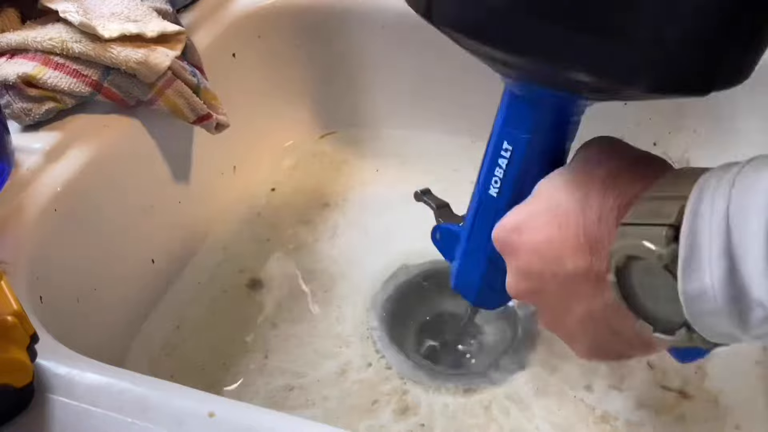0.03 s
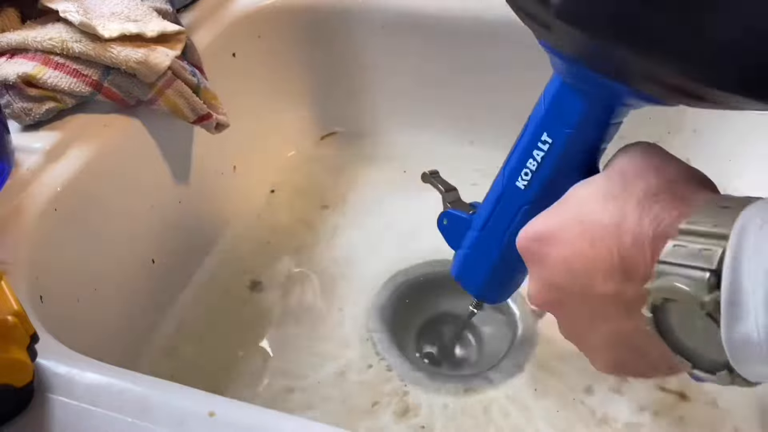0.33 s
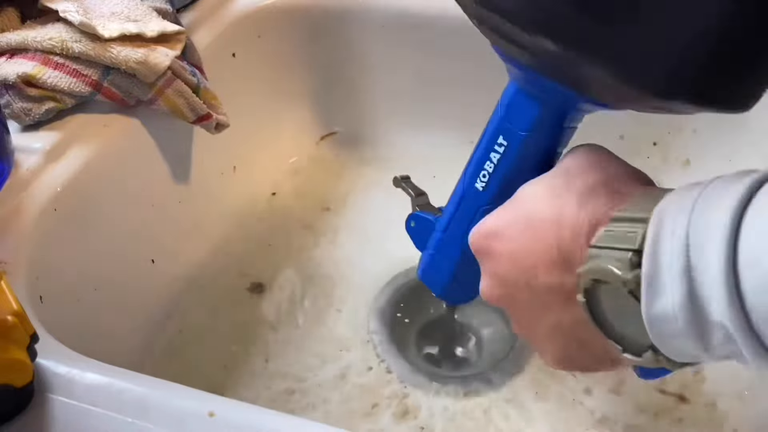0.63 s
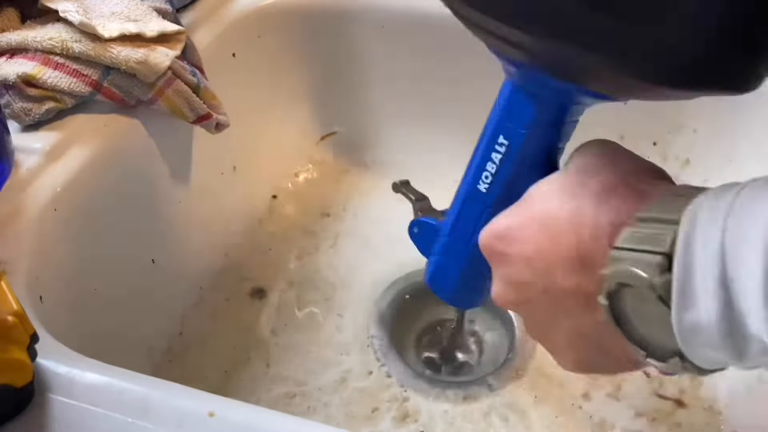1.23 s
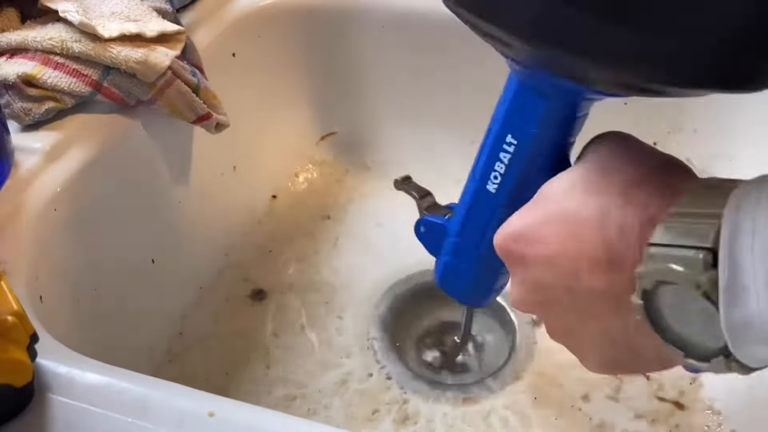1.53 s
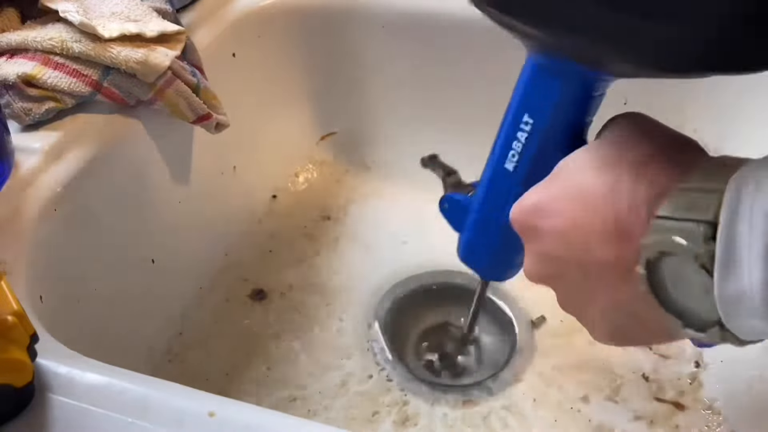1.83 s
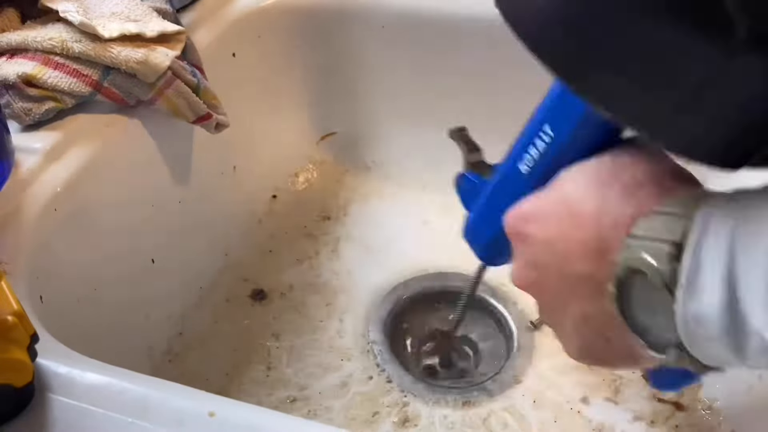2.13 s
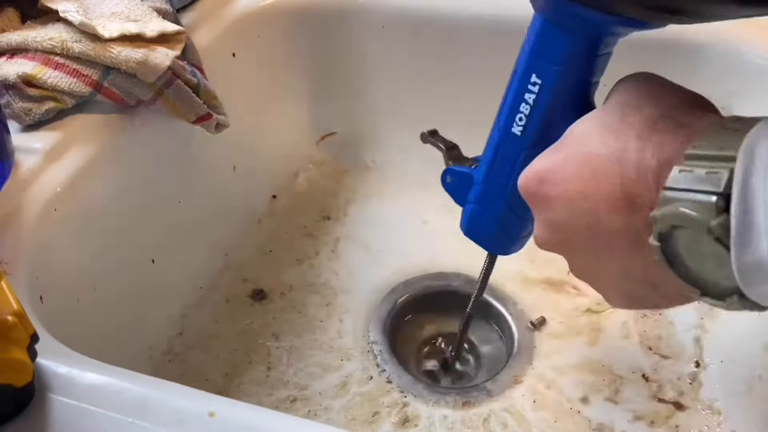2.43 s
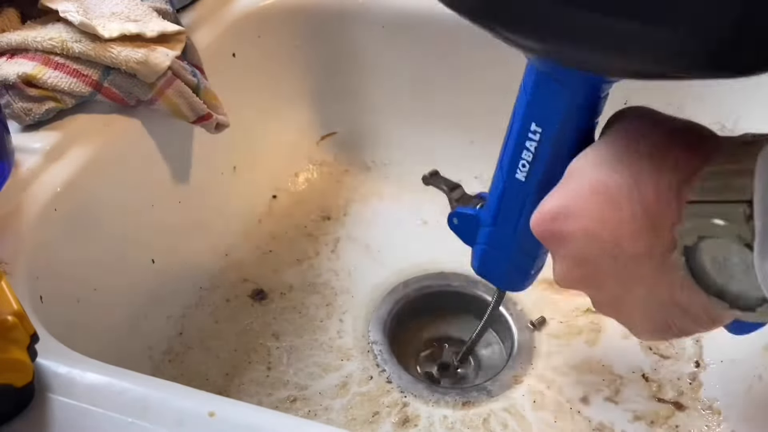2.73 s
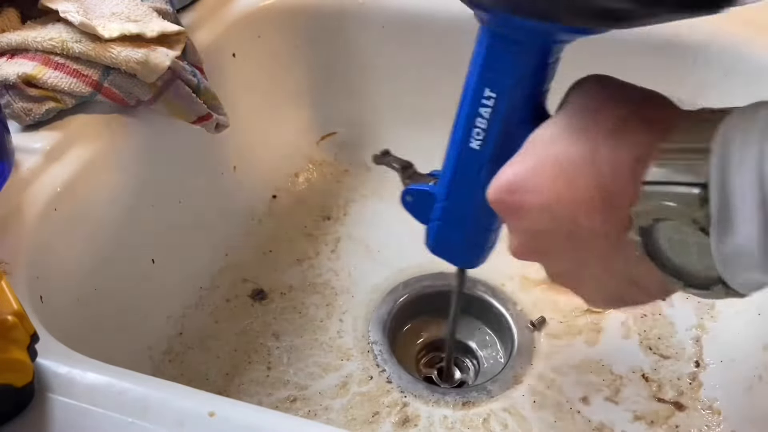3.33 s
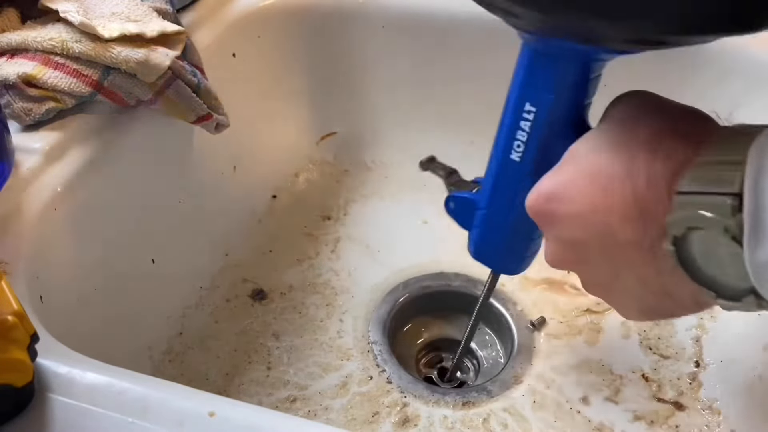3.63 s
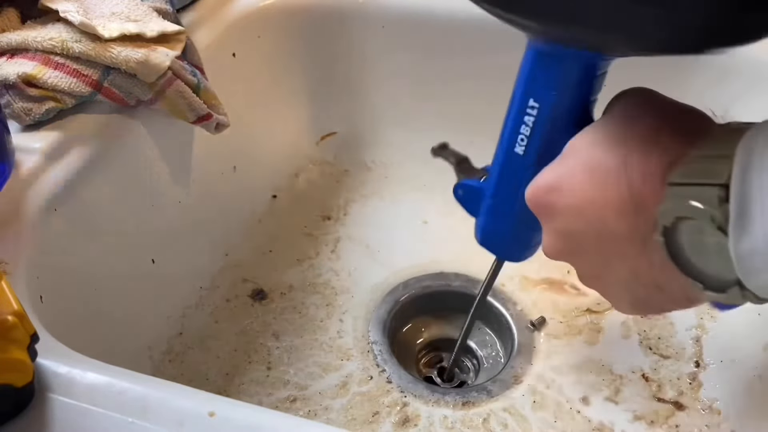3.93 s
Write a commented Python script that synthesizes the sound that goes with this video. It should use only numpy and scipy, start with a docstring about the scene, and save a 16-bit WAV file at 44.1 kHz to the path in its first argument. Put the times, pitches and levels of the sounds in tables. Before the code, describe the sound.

Water slurps down a sink drain, then a metal cable scrapes and clinks in it.

```python
"""The last water leaves a kitchen sink past the steel cable of a drum snake, heard from close by.
First, air is sucked through in rapid, rattling gulps that deepen as the water level falls.
From 1.3 s a few big glugs ring the pipe and clear the drain; by 2 s the suction has stopped.
Then the cable is worked in the open drain: it scrapes and clinks on the strainer, the hollow drum
rumbles, and water trickles and gurgles in the pipe."""
import sys
import numpy as np
from scipy import signal
from scipy.fft import rfft, irfft
from scipy.io import wavfile
from scipy.ndimage import uniform_filter1d, map_coordinates

SR = 44100
rng = np.random.default_rng(int(sys.argv[2]) if len(sys.argv) > 2 else 0)


def digitize_waveform(pressure):
    """Quantize a signal to 16-bit integers and store it at the path in sys.argv[1].

    Rows of a 2-D input are taken as channels; values are limited to [-1, 1].
    """
    field = np.atleast_2d(pressure).T
    bounded = np.clip(field, -1, 1)
    quanta = np.round(bounded * 32767).astype(np.int16)
    wavfile.write(sys.argv[1], SR, quanta)


N = 176400
TIME = np.arange(N) / SR


def from_db(db):
    """Decibels to gain."""
    return 10 ** (np.asarray(db) / 20)


def unit_rms(x):
    """Scale to rms 1."""
    return x / np.sqrt(np.mean(x ** 2) + 1e-20)


def at_time(rows):
    """Breakpoints to a per-sample curve."""
    return np.interp(TIME, *np.transpose(rows))


def at_hz(rows, hz):
    """Table lookup on a log-frequency axis."""
    table_hz, values = np.transpose(rows)
    return np.interp(np.log(hz + 1), np.log(table_hz), values)


def swell(peak_s, rise_s, decay_s, hold_s):
    """Exponential rise to 1, hold, exponential decay."""
    rising = np.minimum((TIME - peak_s) / rise_s, 0)
    falling = np.maximum(TIME - peak_s - hold_s, 0) / decay_s
    return np.exp(np.maximum(rising - falling, -40))


def sputter(depth_db, per_s):
    """Random gain: a water film tears and closes, or a contact shifts."""
    steps = np.clip(rng.standard_normal(2000), -2, 2)
    return from_db(depth_db * np.interp(TIME * per_s, np.arange(len(steps)), steps))


# left-right likeness of noise: (frequency [Hz], correlation [0..1])
STEREO_CORRELATION = [(500, 0.97), (2000, 0.94), (5000, 0.46), (14000, 0.22)]

def grains(spectrum, grain_db, patchy_db=0):
    """Stereo noise in uneven 0.45 ms grains, rms 1; patchy_db makes its colour flicker."""
    hz = np.arange(N // 2 + 1) * SR / N
    spread = np.clip(rng.standard_normal(N // 20 + 1), -2, 2)
    noise = rng.standard_normal((2, N)) * from_db(grain_db * np.repeat(spread, 20)[:N])
    if patchy_db:
        cell_hz, cell_s, cells = signal.stft(noise, SR, nperseg=256)
        grid = np.meshgrid(np.log2(1 + cell_hz / 2000) * 8, cell_s / .007, indexing="ij")
        patches = map_coordinates(np.clip(rng.standard_normal((32, 600)), -1.6, 1.6), grid, order=1)
        noise = signal.istft(cells * from_db(patchy_db * patches), SR)[1][:, :N]
    mid, side = rfft(noise) * from_db(at_hz(spectrum, hz))
    alike = np.clip(at_hz(STEREO_CORRELATION, hz), 0, 1)
    return unit_rms(irfft(np.sqrt(1 + alike) * mid + np.sqrt(1 - alike) * side * [[1], [-1]], N))


def resonate(x, hz, width_hz):
    """Two-pole resonance, peak gain 1."""
    r = np.exp(-np.pi * width_hz / SR)
    feedback = [1, -2 * r * np.cos(2 * np.pi * hz / SR), r * r]
    return signal.lfilter(np.array([1, 0, -1]) * (1 - r * r) / 2, feedback, x)


def out_of_step(pair, hz, sign):
    """A resonance reaches one side later; the phase gap shrinks in the bass."""
    gap_rad = sign * 0.93 * min(hz / 410, 1)
    lag_samples = round(gap_rad * SR / hz / (2 * np.pi))
    return np.array([pair[0], np.roll(pair[1], lag_samples)])


def ring_modes(modes, force):
    """A rough force rings a set of resonances; each waxes and wanes on its own."""
    drive = force * grains([(20, 0), (20000, 0)], grain_db=3)
    power = sum(from_db(2 * db) * np.pi * width_hz / SR for _, width_hz, db in modes)
    out = 0
    for k, (hz, width_hz, db) in enumerate(modes):
        sign = (-1) ** k
        share = unit_rms(sputter(depth_db=5, per_s=35))
        out += sign * from_db(db) * out_of_step(resonate(drive * share, hz, width_hz), hz, sign)
    return out / np.sqrt(power)


def blips(rows, rise_s, jitter, glide_per_decay=.02):
    """Air pockets ring briefly and unsteadily, rising a little in pitch."""
    out = np.zeros((2, N))
    wobble = unit_rms(uniform_filter1d(rng.standard_normal(N), size=50))
    for (s, hz, db, decay_s), (half_turns, skew) in zip(rows, rng.uniform(-0.74, 1, (len(rows), 2))):
        glide = glide_per_decay * np.clip((TIME - s) / decay_s - 1, -2, 2)
        pitch_hz = hz * (1 + jitter * wobble + glide)
        phase = 2 * np.pi * np.cumsum(pitch_hz) / SR + np.pi * half_turns
        stereo_rad = np.sign(skew) * np.array([[.5], [-.5]])
        out += from_db(db) * swell(s, rise_s, decay_s, decay_s / 2) * np.sin(phase + stereo_rad)
    return out


def reflections(x, t60_s=0.093):
    """Dense short echoes from basin and kitchen, different at each side."""
    t = TIME[:SR // 2]
    tail = rng.standard_normal((2, len(t))) * from_db(-60 * t / t60_s) * (t > .002)
    tail = signal.sosfilt(signal.butter(1, 6000, fs=SR, output="sos"), tail)
    return signal.fftconvolve(x, unit_rms(tail) / np.sqrt(len(t)), axes=1)[:, :N]


# drum handling: (time [s], level [dB])
RUMBLE_LEVEL = [(1.55, -100), (2.0, -56.5), (2.7, -56), (3.0, -49), (3.4, -53.5), (3.53, -46), (4, -50.5)]
# hollow drum: (frequency [Hz], gain [dB])
RUMBLE_SPECTRUM = [(20, -63), (45, -15.5), (79, 2), (115, -9.5), (170, -1), (260, -17.5), (600, -34.5)]

def drum_rumble():
    """The hollow drum rumbles as it is handled."""
    return from_db(at_time(RUMBLE_LEVEL)) * grains(RUMBLE_SPECTRUM, grain_db=5.5)


# wall flow: (time [s], level [dB])
TRICKLE_LEVEL = [(0, -67), (2.06, -60.5), (2.4, -53), (4, -48.5)]
# wall flow: (frequency [Hz], gain [dB])
TRICKLE_SPECTRUM = [(150, -36), (500, -7), (2000, 1.5), (10000, -12.5), (15000, -19)]

def trickle():
    """Water runs faintly down the drain wall."""
    return from_db(at_time(TRICKLE_LEVEL)) * grains(TRICKLE_SPECTRUM, grain_db=5, patchy_db=5)


# sloshing: (time [s], level [dB])
SLOSH_LEVEL = [(1.55, -88), (1.7, -49.5), (2.05, -63.5), (2.32, -52), (2.65, -59), (2.85, -46), (2.98, -41),
               (3.05, -41.5), (3.14, -58), (3.22, -51.5), (3.27, -38), (3.35, -46), (3.43, -36.5),
               (3.52, -46.5), (3.65, -40.5), (4, -47.5)]
# small bubbles: (frequency [Hz], gain [dB])
SLOSH_SPECTRUM = [(100, -12), (200, 4.5), (500, 2.5), (700, 0.5), (1500, 3.5), (4000, -33)]
# large bubbles: (time [s], pitch [Hz], level [dB], decay [s])
LARGE_BUBBLES = [(2.871, 744, -36, 0.01), (2.889, 563, -35, 0.012), (2.962, 790, -32.5, 0.0031),
                 (2.968, 1130, -31, 0.0027), (2.985, 558, -38.5, 0.024), (3.04, 465, -33, 0.009),
                 (3.1935, 2000, -31.5, 0.001), (3.438, 1516, -26, 0.0033), (3.702, 565, -35, 0.026)]

def gurgle(pitches=28, bubbles_per_s=450, q=8):
    """Many small bubbles ring at random pitches in the pipe; a few large ones burst."""
    sizes = from_db(2.05 * np.minimum(rng.exponential(1, N), 3))
    kicks = sizes * rng.choice([-1, 1], N) * (rng.random(N) < bubbles_per_s / SR)
    pitch_index = rng.integers(0, pitches, N)
    small = 0
    for k, hz in enumerate(np.geomspace(150, 3000, pitches)):
        ring = unit_rms(resonate(kicks * (pitch_index == k) + 1e-18, hz, hz / q))
        small += from_db(at_hz(SLOSH_SPECTRUM, hz)) * out_of_step([ring, ring], hz, (-1) ** k)
    large = blips(LARGE_BUBBLES, rise_s=0.00085, jitter=0.1084)
    return from_db(at_time(SLOSH_LEVEL)) * unit_rms(small) + large


def rattle_force(start_s, decay_s, ticks_per_s=34, max_db=-48.5):
    """Loose coils tick irregularly in the emptied drain."""
    ticks = (rng.random(N) < ticks_per_s / SR) * rng.random(N) * (TIME > start_s)
    return from_db(max_db) * signal.lfilter([1], [1, -np.exp(-1 / (decay_s * SR))], ticks + 1e-18)


# coils sliding on the strainer: (time [s], level [dB], hold [s], release [s])
CABLE_SCRAPES = [(2.109, -48.5, 0.088, 0.0082), (2.258, -42, 0.012, 0.034), (2.284, -37.5, 0.056, 0.03),
                 (2.416, -48.5, 0.056, 0.0098), (2.627, -46, 0.0079, 0.014), (2.724, -39, 0.039, 0.057),
                 (3.008, -43, 0.011, 0.073), (3.245, -43, 0.036, 0.0083), (3.281, -38, 0.017, 0.028),
                 (3.369, -43.5, 0.01, 0.017), (3.435, -48.5, 0.079, 0.026), (3.558, -36.5, 0.054, 0.029),
                 (3.702, -45, 0.0072, 0.067), (3.792, -45, 0.06, 0.0067), (3.889, -40, 0.029, 0.017),
                 (3.948, -42, 0.011, 0.019)]
# friction noise: (frequency [Hz], gain [dB])
SCRAPE_SPECTRUM = [(100, 2.5), (210, 12.5), (500, 0.5), (900, 8.5), (2400, -3.5), (3800, 7.5), (5400, 1),
                   (6800, -3), (9000, -14), (11500, 2.5), (15000, -41)]
# knocks on the metal: (time [s], level [dB])
CABLE_CLINKS = [(2.18, -45), (2.726, -34.5), (2.745, -39), (2.772, -37), (3.242, -26.5), (3.292, -34.5),
                (3.458, -33), (3.553, -33.5), (3.691, -35), (3.831, -34), (3.884, -30.5), (3.948, -38)]
# impact noise: (frequency [Hz], gain [dB])
CRACK_SPECTRUM = [(200, -7), (1000, 4.5), (7500, 9), (15000, -5)]
# bumps on the hollow drain: (time [s], pitch [Hz], level [dB])
CABLE_THUDS = [(2.976, 176, -37), (3.252, 223, -33), (3.3, 273.7, -34), (3.56, 177.5, -47),
               (3.624, 218.7, -36.5), (3.712, 323.7, -36.5), (3.901, 415, -38), (3.957, 191, -33.5)]
# strainer and cable resonances: (frequency [Hz], width [Hz], gain [dB])
METAL_MODES = [(415, 10.7, 5.5), (565, 29, 5.5), (1525, 37, 3.5), (2068, 39, 2), (2197, 35, -1),
               (2540, 110, -1), (2866, 65, 1), (3437, 100, 5), (3770, 70, 3), (4536, 52, 0.5),
               (6260, 92, 4), (6820, 70, 2.5), (7500, 290, -7)]

def cable(clink_decay_s=0.0048, thud_decay_s=0.012):
    """Scrapes and knocks ring the same strainer and coils; heavier bumps thud in the drain."""
    rub = sum(from_db(db) * swell(s, 0.0039, release_s, hold_s)
              for s, db, hold_s, release_s in CABLE_SCRAPES)
    knock = sum(from_db(db) * swell(s, 0.00038, clink_decay_s, 0.0023) for s, db in CABLE_CLINKS)
    knock += rattle_force(start_s=CABLE_SCRAPES[0][0], decay_s=clink_decay_s / 2)
    friction = from_db(-3) * rub * grains(SCRAPE_SPECTRUM, grain_db=2, patchy_db=5.5)
    crack = from_db(-1.5) * knock * grains(CRACK_SPECTRUM, grain_db=2.5)
    thuds = blips([(s, hz, db, thud_decay_s) for s, hz, db in CABLE_THUDS], rise_s=0.0022, jitter=0.108)
    ring = ring_modes(METAL_MODES, from_db(-1.5) * rub + knock)
    return friction + crack + thuds + ring


# big gulps: (time [s], level [dB], rise [s], decay [s])
PIPE_GLUGS = [(1.338, -41, 0.017, 0.032), (1.444, -34, 0.0036, 0.0059), (1.54, -36, 0.01, 0.026),
              (1.604, -36.5, 0.0072, 0.0092), (1.633, -27, 0.0035, 0.014), (1.748, -27.5, 0.012, 0.02),
              (1.884, -31.5, 0.014, 0.0085), (1.934, -36.5, 0.011, 0.02), (2.965, -36, 0.016, 0.016),
              (3.44, -38, .003, 0.0086)]
# air resonances of the pipe: (frequency [Hz], width [Hz], gain [dB])
PIPE_MODES = [(390, 68, -2.5), (500, 60, 4.5), (779, 69, 1), (1130, 86, 2.5), (1317, 61, 1), (1533, 22, 4),
              (1903, 57, 0), (2516, 150, -3.5), (2886, 140, 0), (3436, 88, -6.5)]
# splash: (frequency [Hz], gain [dB])
SPLASH_SPECTRUM = [(150, -13), (500, 9), (1500, -16), (3500, 9), (6000, 9), (14000, -2)]

def glugs(seal_break_s=1.635, sealed_cut_hz=420, boom_hz=205, boom_width_hz=22, boom_lag_s=0.023):
    """Big gulps ring the whole pipe and splash; its deep notes are shut off until the seal breaks."""
    force = sum(from_db(db) * swell(s, rise_s, decay_s, 0.0015) for s, db, rise_s, decay_s in PIPE_GLUGS)
    ring = ring_modes(PIPE_MODES, force)
    splash = from_db(-5.5) * force * grains(SPLASH_SPECTRUM, grain_db=3.5)
    late_force = np.interp(TIME - boom_lag_s, TIME, force)
    boom = from_db(-11) * ring_modes([(boom_hz, boom_width_hz, 0)], late_force)  # deepest pipe note
    sealed = signal.sosfilt(signal.butter(4, sealed_cut_hz, "high", fs=SR, output="sos"), ring + splash)
    opened = np.clip((TIME - seal_break_s) / .005, 0, 1)
    spray_gain = from_db(-6) * np.sqrt(force * from_db(at_time(SUCTION_LEVEL)))  # dies with the suction
    spray = spray_gain * grains(SPRAY_SPECTRUM, grain_db=6)
    return opened * (ring + splash + boom) + (1 - opened) * sealed + spray


# air pocket resonance: (time [s], pitch [Hz])
POCKET_PITCH = [(0, 900), (.7, 860), (1.25, 682), (1.4, 521.5), (1.6, 430.4)]

def air_pocket(ratio, base_width_hz=276):
    """Air rushes through the growing pocket above the drain: a noise band sinking in pitch."""
    lowpass = signal.butter(2, base_width_hz * np.sqrt(ratio) / 2, fs=SR, output="sos")
    band = signal.sosfilt(lowpass, rng.standard_normal((2, 2, N)))
    phase = 2 * np.pi * np.cumsum(ratio * at_time(POCKET_PITCH)) / SR
    mid, side = band[0] * np.cos(phase) + band[1] * np.sin(phase)
    return unit_rms(mid + 0.043 * side * [[1], [-1]])


# air pinched off in a narrow gap: (time [s], pitch [Hz], level [dB])
GAP_CHIRPS = [(.152, 5460, -24.5), (0.3146, 5300, -33), (.437, 4450, -22), (0.509, 4200, -31),
              (.878, 3330, -27.5), (0.995, 4180, -25), (1.0906, 3870, -20), (1.124, 3820, -27),
              (1.19, 3980, -24), (1.246, 3900, -31), (1.284, 3770, -16), (1.494, 1253, -25),
              (1.541, 3300, -22.5), (1.637, 779.5, -27.5)]
# suction between gulps: (time [s], level [dB])
SUCTION_LEVEL = [(0, -41.5), (.05, -57), (.2, -49), (.7, -49.5), (.95, -44), (1.6, -45.5), (1.7, -43),
                 (1.82, -47), (1.94, -36.5), (2.0, -66), (2.1, -100)]
# suction noise: (frequency [Hz], gain [dB])
SUCTION_SPECTRUM = [(100, -45), (400, -2.5), (800, 5.5), (2100, 5), (5000, 1), (8000, 3), (16000, -1.5)]
# gulps of air: (time [s], hiss level [dB], decay [s], spray level [dB])
AIR_GULPS = [(0.018, -53, 0.0023, -41), (0.137, -33.5, 0.0035, -37), (0.1527, -27.5, 0.00091, -34),
             (0.1836, -34, 0.0035, -39), (0.235, -33.5, 0.0033, -35.5), (0.241, -37, 0.0014, -41),
             (0.2706, -32, 0.0012, -42), (0.317, -35.5, 0.0023, -40), (0.3543, -35, 0.00084, -33),
             (0.393, -40, 0.0036, -46), (0.4342, -32, 0.0017, -34), (0.463, -35, 0.0086, -40),
             (0.5117, -29, 0.0013, -37), (0.515, -42, 0.0049, -41), (0.5518, -31, 0.0067, -28.5),
             (0.584, -31.5, 0.0069, -36), (0.627, -35.5, 0.0083, -38), (0.6657, -34.5, 0.004, -41),
             (0.68, -35.5, 0.02, -49), (0.7303, -36.5, 0.024, -41.5), (0.7904, -35, 0.0046, -39),
             (0.824, -36.5, 0.016, -43), (0.875, -37.5, 0.014, -41), (0.904, -34.5, 0.0031, -33),
             (0.9239, -33, 0.0087, -34), (0.934, -35, 0.008, -41), (0.99, -29.5, 0.01, -34.5),
             (1.0192, -30, 0.011, -32), (1.054, -36, 0.011, -38), (1.0875, -31, 0.0021, -35),
             (1.12, -30.5, 0.0043, -34.5), (1.143, -65, 0.0025, -34), (1.1539, -35.5, 0.015, -36),
             (1.189, -30.5, 0.0073, -36.5), (1.2301, -33, 0.0068, -37), (1.2436, -34.5, 0.0038, -37),
             (1.2816, -33.5, 0.0019, -37), (1.324, -37, 0.004, -31), (1.379, -38, 0.0073, -52),
             (1.434, -53, 0.0081, -41), (1.4923, -32.5, 0.0041, -31.5), (1.5373, -34.5, 0.0065, -34),
             (1.5864, -35, 0.04, -35.5)]
# gulp hiss: (frequency [Hz], gain [dB])
HISS_SPECTRUM = [(300, -36.5), (1200, -13), (2100, -5), (4400, -2.5), (5400, -2.5), (7000, -10),
                 (10000, -51)]
# spray: (frequency [Hz], gain [dB])
SPRAY_SPECTRUM = [(3000, -48), (6500, -8.5), (9000, -2), (13000, 0.5), (16000, -8)]

def slurp(pocket_lag_s=0.0027, chirp_cycles=5.5):
    """Over sputtering suction, each gulp hisses, spits spray, then sounds the air pocket."""
    suction_gain = from_db(at_time(SUCTION_LEVEL)) * sputter(depth_db=5, per_s=170)
    hiss_gain, spray_gain, pocket_gain = 0, 0, 0
    for s, hiss_db, decay_s, spray_db in AIR_GULPS:
        gulp = swell(s, rise_s=0.0013, decay_s=max(decay_s, .001), hold_s=0.0025)
        answer = swell(s + pocket_lag_s, rise_s=0.002, decay_s=0.0084, hold_s=0.0042)
        hiss_gain = np.maximum(hiss_gain, from_db(hiss_db - 1.5) * gulp)
        spray_gain = np.maximum(spray_gain, from_db(spray_db - 2.5) * gulp)
        pocket_gain = np.maximum(pocket_gain, from_db(0.84 * hiss_db - 24) * answer)
    pocket_gain += from_db(-13.5) * suction_gain
    note = pocket_gain * (air_pocket(ratio=1) + air_pocket(ratio=2.45))
    chirps = blips([(s, hz, db, chirp_cycles / hz) for s, hz, db in GAP_CHIRPS],
                   rise_s=.0009, jitter=0.027)
    hiss = hiss_gain * grains(HISS_SPECTRUM, grain_db=4, patchy_db=3.5)
    spray = spray_gain * grains(SPRAY_SPECTRUM, grain_db=5, patchy_db=2)
    suction = suction_gain * grains(SUCTION_SPECTRUM, grain_db=3.5, patchy_db=4.5)
    return hiss + spray + note + chirps + suction


def scene():
    """Water and cable with the basin's reflections, over the dry drum rumble."""
    rumble = drum_rumble()
    wall_flow = trickle()
    left, right = slurp()
    late_left = map_coordinates(left, [np.arange(N) - .5], order=5)  # half-sample delay
    drain_mouth = wall_flow + np.array([late_left, right]) + glugs() + cable()
    direct = drain_mouth * from_db([[.45], [-.45]]) + gurgle()  # mouth slightly left
    return rumble + direct + from_db(-15) * reflections(direct)


def record(dry):
    """Steep low-pass at 16.2 kHz."""
    return signal.sosfilt(signal.ellip(12, .1, 80, 16200, fs=SR, output="sos"), dry)


dry = scene()
out = record(dry)
digitize_waveform(out)
```